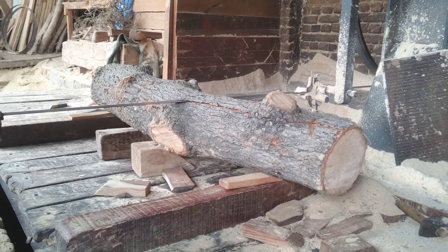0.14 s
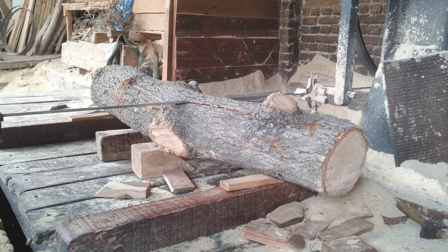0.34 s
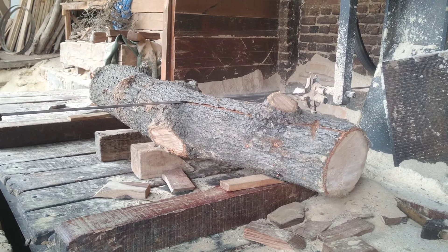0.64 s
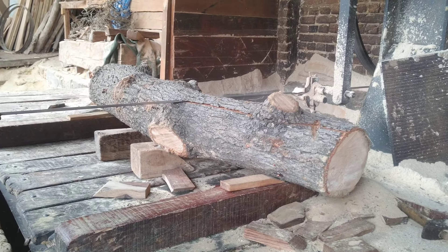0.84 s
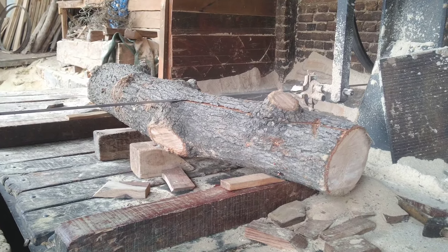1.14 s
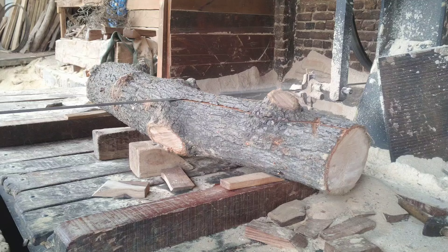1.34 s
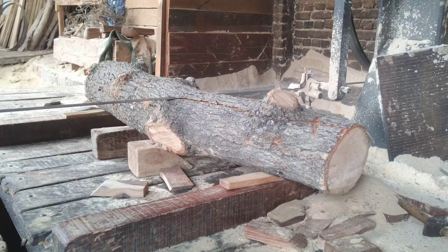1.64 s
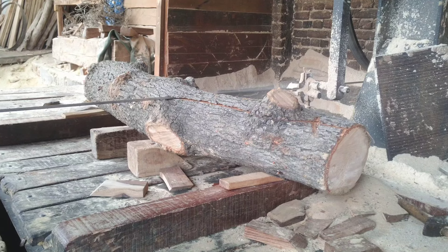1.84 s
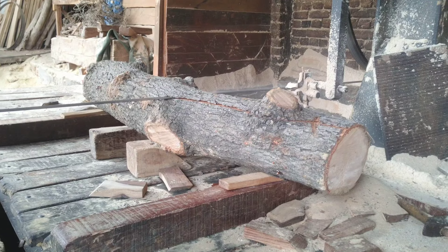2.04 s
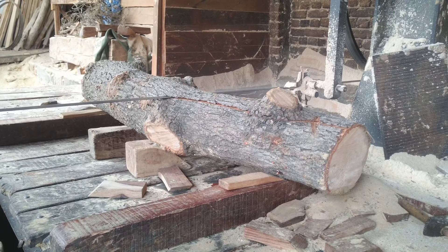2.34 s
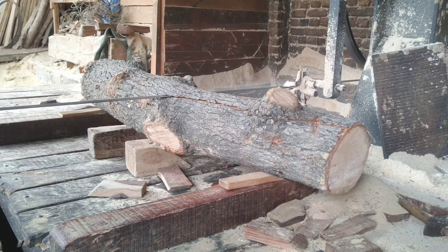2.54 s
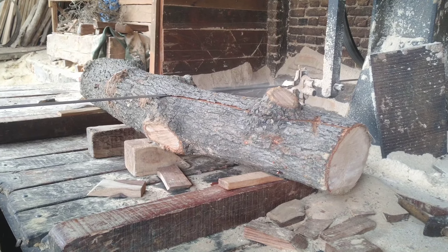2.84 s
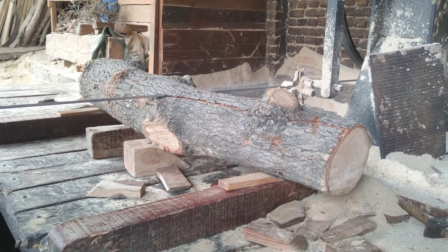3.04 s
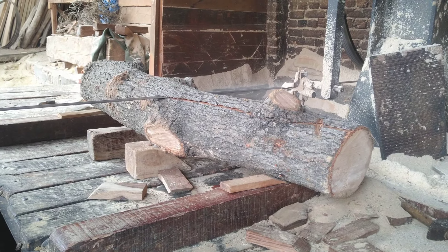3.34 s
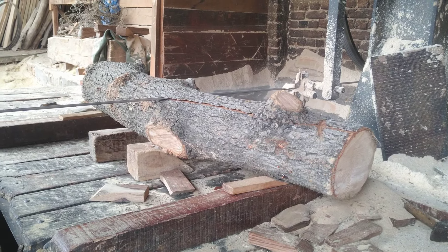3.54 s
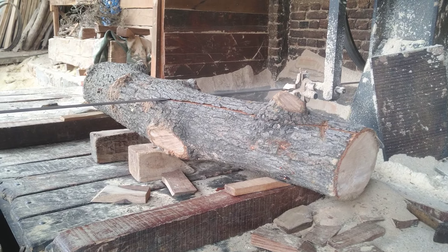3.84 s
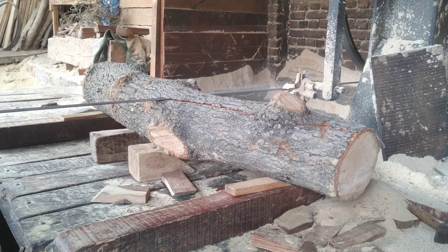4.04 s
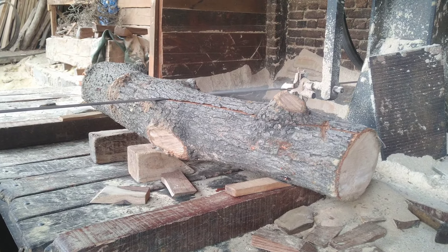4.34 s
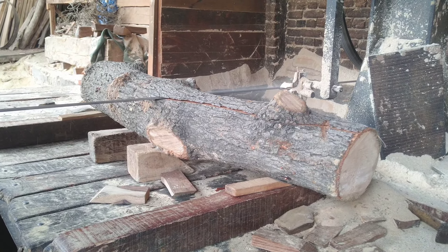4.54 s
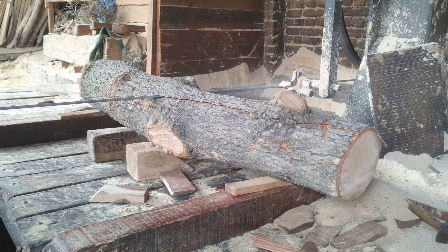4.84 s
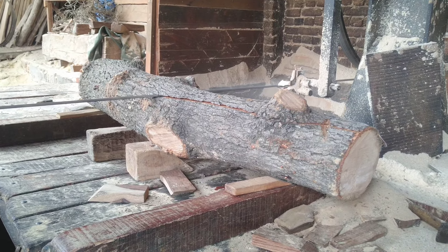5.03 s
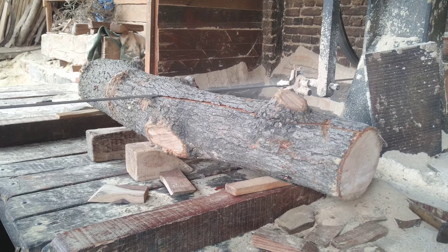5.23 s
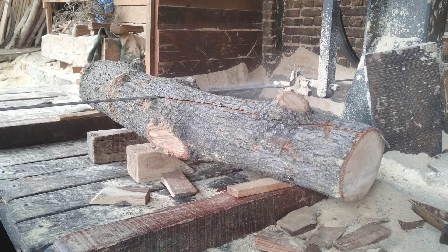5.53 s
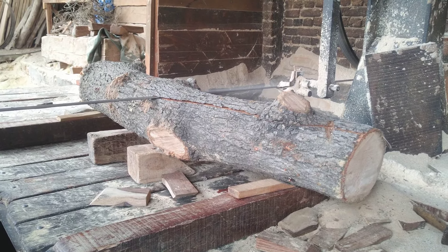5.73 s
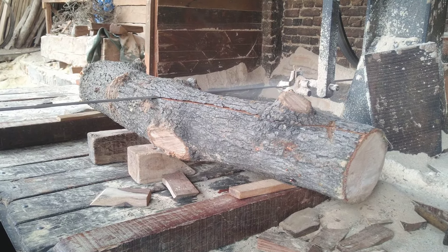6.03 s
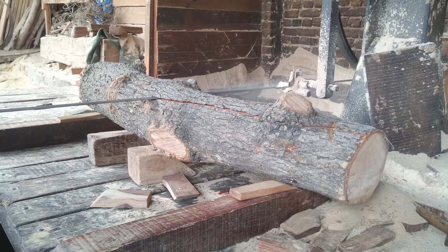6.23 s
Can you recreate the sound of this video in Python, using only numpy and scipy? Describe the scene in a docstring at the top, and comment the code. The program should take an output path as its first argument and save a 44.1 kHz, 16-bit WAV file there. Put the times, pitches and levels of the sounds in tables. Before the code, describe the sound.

A band sawmill cuts steadily through a log in a shed, a rough grinding roar over a throbbing low drone, with knocks and thin hiss.

```python
"""A shed where a band sawmill cuts steadily through a log. The teeth's uneven bites shake frame, log and blade:
noise through many blurred resonances, over a low throbbing drone and the motor's hum (a wavering sine).
Single resonances flare as short tones: thumps, knocks, pings. A thin hiss and whistle throb with each turn
of the band wheel. The left microphone hears the blade's upper resonances much more weakly than the right,
the hiss about equally, the whistle more strongly."""
import sys
import numpy as np
from scipy import signal
from scipy.fft import rfft, irfft, next_fast_len
from scipy.io import wavfile
from scipy.ndimage import uniform_filter1d, map_coordinates

SR = 44100
rng = np.random.default_rng(int(sys.argv[2]) if len(sys.argv) > 2 else 0)


def pcm_store(signal):
    """Save signal as 16-bit PCM."""
    levels = np.round(np.clip(np.atleast_2d(signal), -1, 1) * 32767)
    wavfile.write(sys.argv[1], SR, levels.astype(np.int16).T)


N = 281358
T = np.arange(N) / SR  # seconds

# level curves, used about their means: time_s, level_db
DRONE_LEVEL = [(0.0, -35), (0.09, -34.5), (0.18, -27), (0.25, -34), (0.35, -29), (0.46, -33), (0.75, -28.5),
               (0.8, -35), (1.06, -30), (1.1, -34), (1.24, -28.5), (1.28, -37), (1.37, -25.5), (1.4, -35),
               (1.46, -26.5), (1.49, -36), (1.62, -28.5), (1.67, -36), (1.81, -27), (1.88, -38),
               (1.94, -27.5), (2.04, -36), (2.08, -29), (2.18, -34), (2.4, -31), (2.42, -37), (2.5, -31),
               (2.56, -35), (2.7, -30), (2.9, -34), (3.22, -32), (3.38, -35.5), (3.41, -29), (3.46, -32),
               (3.55, -30.5), (4.03, -32), (4.09, -29), (4.12, -33), (4.16, -31), (4.37, -30.5),
               (4.42, -26.5), (4.62, -33.5), (5.19, -29.5), (5.28, -35), (5.33, -30), (5.37, -36),
               (5.4, -28), (5.53, -35), (5.54, -30), (5.7, -29), (5.79, -36), (5.92, -28), (6.0, -37),
               (6.04, -29.5), (6.25, -36), (6.38, -34)]  # low drone of the frame, throbs unevenly
BLADE_LEVEL = [(0, 0), (1.75, -0.1), (1.95, 0.6), (3.6, 1), (4.0, 0), (5.0, 0.5), (5.2, 0), (5.45, 0.5),
               (6.15, .5), (6.38, 0.5)]  # ring of the blade
# borders between frame, log, growl and blade; edges of the ring near 2.5 kHz
LOW_HZ, MIDDLE_HZ, HIGH_HZ = 340, 760, 1110
RING_LOW_HZ, RING_HIGH_HZ = 2380, 2600


def amp(db):
    """dB to gain."""
    return 10 ** (np.asarray(db) / 20)


def unit(x):
    """Scaled to rms 1."""
    return x / np.sqrt(np.mean(x ** 2) + 1e-20)


def along(points, hz):
    """Value columns of (Hz, value, ..) points, interpolated on a log frequency axis."""
    f, *columns = np.transpose(points)
    return np.array([np.interp(np.log(hz + 1), np.log(f + 1), c) for c in columns])


def swell(rows):
    """Level curve about its mean, one dB value per sample."""
    s, db = np.transpose(rows)
    level_db = np.interp(T, s, db)
    return level_db - level_db.mean()


def wobble(knots_per_s):
    """Smooth random curve."""
    knots = rng.standard_normal(int(N * knots_per_s / SR) + 4)
    return map_coordinates(knots, [np.arange(N) * knots_per_s / SR])


def filtered(x, response):
    """x times a response of frequency."""
    m = next_fast_len(N + 8192)
    return irfft(rfft(x, m) * response(np.fft.rfftfreq(m, 1 / SR)), m)[..., :N]


def below(edge_hz, hz):
    """Share of the power under an edge."""
    return 1 / (1 + (hz / edge_hz) ** 16)


def evened(x):
    """Noise with its level partly evened out, so that it sounds steadier."""
    span_s, share = 0.048, 0.78
    power = uniform_filter1d(np.mean(x ** 2, axis=0), round(span_s * SR))
    power = uniform_filter1d(power, round(span_s * SR / 2))
    return x * unit((np.abs(power) + 1e-12) ** (-share / 2)) * 1.01


def shaken(force, response, patchy_db):
    """Stereo noise driven by an uneven force, in random gain patches, through a two-microphone response."""
    # left-right likeness: frequency_hz, likeness (0 to 1)
    likeness = [(40, .55), (140, .5), (270, .42), (500, .22), (1200, 0)]
    right_lag_s = 0.0003095
    z = signal.stft(unit(force) * rng.standard_normal((2, N)), nperseg=512)[2]
    patches = uniform_filter1d(rng.standard_normal(z.shape), 6, axis=1)
    patches = uniform_filter1d(patches, 8, axis=2)
    pair = unit(signal.istft(z * amp(patchy_db * unit(patches)), nperseg=512)[1][:, :N])

    def mid_side(hz):
        angle = np.arccos(np.clip(along(likeness, hz)[0], -1, 1)) / 2
        return np.array([np.cos(angle), np.sin(angle)])

    mid, side = filtered(pair, mid_side)
    delay = lambda hz: np.exp(np.outer([0, -2j * np.pi * right_lag_s], hz))
    return filtered(np.array([mid + side, mid - side]), lambda hz: response(hz) * delay(hz))


def hum():
    """Motor hum: a sine wavering in pitch and level, its phase drifting between the microphones."""
    pitch_hz, waver_hz, waver_db = 135.4, 2.01, 1.5
    left_right_db = np.array([[-44], [-39.5]])  # rms, before the wavering
    drone_share = 0.45  # share of the drone's throb in dB taken up
    phase = 2 * np.pi * np.cumsum(pitch_hz + waver_hz * wobble(6)) / SR
    level_db = left_right_db + waver_db * wobble(5) + drone_share * swell(DRONE_LEVEL)
    return np.sqrt(2) * amp(level_db) * np.sin([phase + 1.07 * wobble(4), phase])


def wheel():
    """Untrue band wheel: each turn has a loud and a soft half, and one brief scrape of the blade."""
    turns_per_s, peak_s = 6.497, .09
    throb = np.tanh(1.2 * np.cos(2 * np.pi * turns_per_s * (T - peak_s)))
    throb = throb * amp(2 - .9 * T + wobble(1.7))  # eases as the cut goes on
    turns = turns_per_s * (T - peak_s + .015) + 1.5  # scrape leads the loudest point by 15 ms
    strength = 2 * rng.uniform(size=int(turns[-1]) + 1)[turns.astype(int)]  # new each turn
    scrape = strength * np.exp(-((turns % 1 - .5) / 0.035) ** 2)
    return throb, scrape


def lurches():
    """Teeth catch in hard grain; log and blade lurch together: brief swells in dB."""
    # time_s, swell_db (full in the log, a share of it in growl and blade)
    catches = [(.129, 5.5), (.388, 3), (1.451, 2.5), (1.929, 3), (2.63, 3), (2.707, 1.5), (3.177, 1),
               (4.292, 4), (4.39, 2), (4.534, 2), (4.869, 0.5), (5.005, 1.5), (5.195, 3.5), (5.915, 1)]
    half_width_s = 0.0094
    return sum(db * np.exp(-((T - s) / half_width_s) ** 2) for s, db in catches)


def mill_body():
    """Response of frame, log and blade: resonances adding power to a bed, with notches where they cancel."""
    # bed under the resonances: frequency_hz, left_db, right_db (relative, per Hz)
    bed = [(20, -23, -24), (45, -19, -18), (75, -12.5, -10), (112, -11, -10.5), (230, -8, -6),
           (330, -13, -5), (720, -12, -3), (1300, -12, -1), (2200, -16, 0), (2800, -13, -1),
           (3300, -15, -6), (4700, -24, -15), (5100, -33, -18), (5800, -46, -22), (6200, -50, -32),
           (6600, -70, -45), (9000, -120, -120)]
    # resonances: centre_hz, width_hz (at quarter power), left_db, right_db (over the bed)
    modes = [(136, 14, 12, 16), (155, 25, 13.5, 17), (176, 22, 18, 21.5), (198, 25, 8, 13.5),
             (261, 55, 8.5, 14), (415, 36, 11, 8), (452, 14, 0, 3), (484, 26, 5, 9.5), (511, 26, 3, 6),
             (548, 24, 3, 5), (580, 38, 9, 10), (612, 17, -3, 11.5), (650, 25, 0, 5), (675, 22, 4, 10.5),
             (727, 20, -6, 2), (824, 58, 3, 10), (880, 16, -6, 2), (919, 18, 12, 12.5), (947, 20, 4, 10),
             (998, 95, 6, 8.5), (1054, 24, -10, 5.5), (1158, 24, -2, 5.5), (1196, 22, -10, 6.5),
             (1268, 24, 7, 6.5), (1303, 24, -4, 2), (1407, 28, 5, 6.5), (1515, 70, 0, 2.5),
             (1550, 22, -2, 3), (1675, 58, 4, -1), (1780, 55, 1, 6), (1841, 17, -3, 2), (1978, 20, -6, 1),
             (2062, 40, -8, -2), (2365, 25, -6, 0), (2461, 55, 4, 8.5), (2523, 150, 0, 4.5),
             (2685, 17, -3, 2), (2760, 60, -3, 4), (2813, 18, -6, 1)]
    # cancellations: centre_hz, width_hz, gain_db
    notches = [(353, 22, -3), (439, 14, -3), (702, 20, -5), (866, 14, -3), (1087, 24, -2), (1345, 16, -2),
               (1875, 20, -2), (2032, 22, -2), (2220, 90, -1.5), (2340, 20, -2.5)]
    every_hz = np.arange(SR // 2 + 1)
    power = np.ones((2, len(every_hz)))
    for centre_hz, width_hz, *db in modes:
        power += amp(db)[:, None] ** 2 / (1 + (2 * (every_hz - centre_hz) / width_hz) ** 2) ** 2
    notch_db = sum(db * np.exp(-(2 * (every_hz - hz) / width_hz) ** 2) for hz, width_hz, db in notches)
    gains = amp(along(bed, every_hz)) * np.sqrt(power) * amp(notch_db)
    return lambda hz: np.array([np.interp(hz, every_hz, gain) for gain in gains])


def hiss(bite, throb, scrape):
    """Thin hiss: high noise throbbing with the wheel, swelling partly with the blade."""
    # frequency_hz, left_db, right_db (relative)
    bed = [(4000, -90, -90), (6000, -32, -32), (6400, -23, -23), (6720, -14, -13), (6980, -18, -18),
           (7400, -9, -9), (8200, -8, -7), (9100, -9, -9), (10800, -7, -6), (12300, -6, -6),
           (15000, -6, -5)]
    blade_share = .4  # share of the blade's swell in dB
    force = amp(0.5 * bite + 0.11 * throb + 1.5 * scrape)
    noise = shaken(force, lambda hz: amp(along(bed, hz)), patchy_db=1.85)
    return amp(-27.5 + blade_share * swell(BLADE_LEVEL)) * noise


def whistle(bite, throb, scrape):
    """Top whistle: the highest noise band, throbbing most with the wheel."""
    # frequency_hz, left_db, right_db (relative)
    bed = [(11000, -90, -90), (12200, -14, -22), (12660, 0.5, -7), (13300, 0.5, -3), (13700, 0, -6),
           (13800, 5, -1), (14100, -2, -3), (15000, -4, -5)]
    # slow rise and fall about the mean: time_s, level_db
    level = [(0, -.6), (1.9, .8), (4.6, -.9), (6.38, 0)]
    force = amp(1.2 * bite + 2.0 * throb + 1.8 * scrape)
    noise = shaken(force, lambda hz: amp(along(bed, hz)), patchy_db=1.0)
    return amp(-29.5 + swell(level)) * noise


def frame(bite, body):
    """Frame: the lowest resonances shaken into a throbbing drone."""
    response = lambda hz: body(hz) * np.sqrt(below(LOW_HZ, hz))
    noise = shaken(amp(0.48 * bite), response, patchy_db=0.35)
    return amp(-14.5 + swell(DRONE_LEVEL)) * evened(noise)


def log(bite, body, lurch_db):
    """Log: its resonances shaken by the bite, lurching, with a slow chance drift of level."""
    # used about its mean: time_s, level_db
    level = [(0.0, -36.5), (0.41, -31), (0.58, -34.5), (1.15, -31.5), (1.7, -36.5), (1.79, -29.5),
             (1.85, -33), (2.66, -34.5), (2.7, -30), (2.75, -33), (3.66, -34.5), (3.8, -38), (3.91, -31.5),
             (4.41, -31.5), (4.78, -36.5), (4.87, -31), (4.99, -35.5), (5.01, -31), (5.05, -35),
             (5.53, -31), (5.9, -33), (5.92, -31), (5.95, -33), (6.38, -34.5)]
    drift_db, drift_knots_per_s = 0.52, 2.86
    response = lambda hz: body(hz) * np.sqrt(below(MIDDLE_HZ, hz) - below(LOW_HZ, hz))
    noise = shaken(amp(0.71 * bite), response, patchy_db=0.4)
    level_db = swell(level) + drift_db * wobble(drift_knots_per_s) + lurch_db
    return amp(-13.5 + level_db) * evened(noise)


def growl(bite, body, lurch_db):
    """Growl: resonances near 1 kHz shaken by the bite."""
    # used about its mean: time_s, level_db
    level = [(0.0, -35.5), (0.12, -31.5), (0.19, -34), (0.39, -31), (0.43, -35.5), (0.62, -29), (0.66, -32),
             (1.08, -35), (1.1, -29), (1.24, -34), (1.83, -33), (2.02, -35), (2.9, -31), (3.0, -34),
             (3.39, -30.5), (3.43, -35), (3.71, -32.5), (3.73, -34.5), (4.39, -32.5), (4.42, -35),
             (4.94, -31.5), (5.12, -36.5), (5.45, -31), (5.49, -34), (6.25, -32), (6.38, -35.5)]
    response = lambda hz: body(hz) * np.sqrt(below(HIGH_HZ, hz) - below(MIDDLE_HZ, hz))
    noise = shaken(amp(.5 * bite), response, patchy_db=0.7)
    return amp(-14.0 + swell(level) + 0.67 * lurch_db) * evened(noise)


def blade(bite, throb, scrape, body, lurch_db):
    """Blade: the high resonances shaken by bite, wheel and scrape; its 2.5 kHz ring returned apart."""
    # ring near 2.5 kHz, used about its mean: time_s, level_db
    ring_level = [(0.0, -41), (0.19, -36.5), (1.67, -37.5), (1.72, -42), (1.79, -36), (1.9, -40),
                  (1.92, -35), (2.2, -36.5), (3.32, -36), (3.36, -39), (3.66, -34), (3.71, -39),
                  (3.84, -36), (4.25, -38), (4.3, -34.5), (4.71, -38.5), (4.74, -35.5), (4.92, -39),
                  (5.24, -33), (5.3, -38), (6.02, -36), (6.06, -41), (6.09, -33), (6.15, -38),
                  (6.33, -34.5), (6.38, -39)]
    force = amp(0.77 * bite + 0.067 * throb + 0.99 * scrape)
    response = lambda hz: body(hz) * np.sqrt(1 - below(HIGH_HZ, hz))
    whole = amp(swell(BLADE_LEVEL) + 0.58 * lurch_db) * shaken(force, response, patchy_db=0.77)

    def band(centre_hz, half_hz):
        return filtered(whole, lambda hz: np.exp(-((hz - centre_hz) / half_hz) ** 4)[None])

    ring = band((RING_LOW_HZ + RING_HIGH_HZ) / 2, (RING_HIGH_HZ - RING_LOW_HZ) / 2)
    upper = band(2820, 90)
    upper_db = 4 * np.exp(-T / 1.9) - 1.5  # higher ring starts strong and fades
    steady = amp(-14.5) * (whole - ring - upper + amp(upper_db) * upper)
    return steady, amp(-15.0 + swell(ring_level)) * evened(ring)


def flaring(layer, body, low_hz, high_hz):
    """Layer plus its band's flares: short swells of tone, to which the layer's noise gives way."""
    # thumps, knocks and pings: time_s, peak_db (at the right microphone), pitch_hz
    events = [(.618, -22, 976), (1.103, -20, 832), (1.359, -22, 169.2), (1.453, -21, 159.8),
              (1.925, -23, 2420), (1.966, -27, 647), (2.637, -23, 943), (2.708, -19.5, 594),
              (2.724, -20, 186.6), (3.626, -23, 584), (3.649, -21, 2440), (4.087, -17, 171.7),
              (4.43, -19, 173), (4.532, -21, 150.5), (4.535, -23, 852), (4.753, -24.5, 920),
              (4.875, -22.5, 667), (5.01, -23, 590), (5.099, -23, 176.4), (5.229, -20, 2460),
              (5.316, -21, 960), (5.558, -29, 594), (5.915, -19.5, 571), (5.916, -18, 176),
              (5.948, -20, 932), (6.095, -20, 2480), (6.235, -22.5, 930)]
    half_width_s, yield_db = 0.0093, -1
    neighbour_ratio, neighbour_db = 1.5, -5  # also stirs resonances about a fifth above
    tones, dip_db = np.zeros((2, N)), np.zeros(N)
    for s, db, hz in events:
        if not low_hz <= hz < high_hz:
            continue
        near = slice(round((s - 4 * half_width_s) * SR), round((s + 4 * half_width_s) * SR))
        shape = np.exp(-((T[near] - s) / half_width_s) ** 2)
        pair_hz = hz * np.array([1, neighbour_ratio * rng.normal(1, .03)])
        gains = body(pair_hz) * amp([db, db + neighbour_db]) / body(pair_hz)[1, 0]
        left_right_shift = np.array([[rng.normal(0, 1.0)], [0]])
        phase = 2 * np.pi * rng.uniform(size=2) + left_right_shift
        waves = np.sin(2 * np.pi * np.outer(pair_hz, T[near]) + phase[..., None])
        tones[:, near] += shape * np.sum(gains[..., None] * waves, axis=1)
        dip_db[near] += yield_db * shape
    return amp(dip_db) * layer + tones


def mill():
    """One uneven bite drives all the noise layers; four of them flare."""
    bite = .5 * wobble(14) + 0.54 * wobble(45)
    throb, scrape = wheel()
    lurch_db = lurches()
    body = mill_body()
    steady_blade, ring = blade(bite, throb, scrape, body, lurch_db)
    mix = hiss(bite, throb, scrape) + whistle(bite, throb, scrape) + steady_blade
    mix = mix + flaring(frame(bite, body), body, 0, LOW_HZ)
    mix = mix + flaring(log(bite, body, lurch_db), body, LOW_HZ, MIDDLE_HZ)
    mix = mix + flaring(growl(bite, body, lurch_db), body, MIDDLE_HZ, HIGH_HZ)
    return mix + flaring(ring, body, RING_LOW_HZ, RING_HIGH_HZ)


def scene():
    """Motor hum under the mill."""
    return hum() + mill()


def record(dry):
    """Steep band limit: down 60 dB each 120 Hz above the top, to -120 dB."""
    top_hz = 14260
    return filtered(dry, lambda hz: amp(-60 * np.clip((hz - top_hz) / 120, 0, 2)))


dry = scene()
out = record(dry)
pcm_store(out)
```